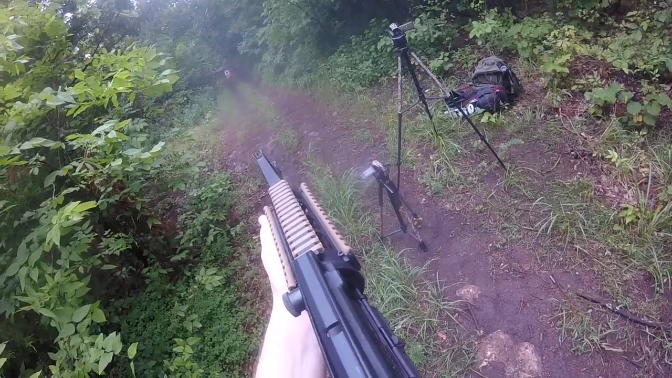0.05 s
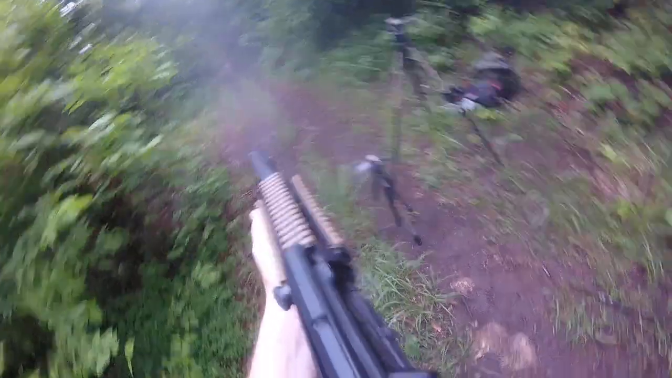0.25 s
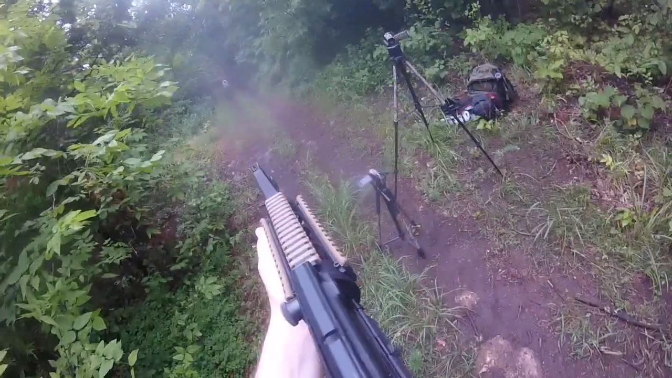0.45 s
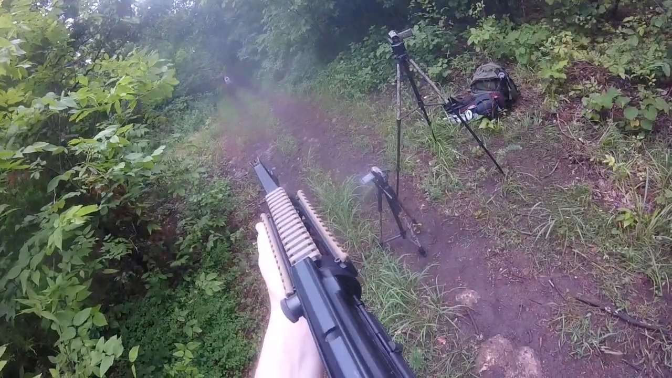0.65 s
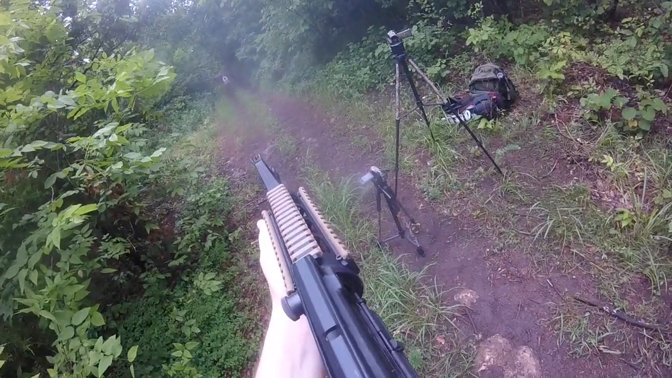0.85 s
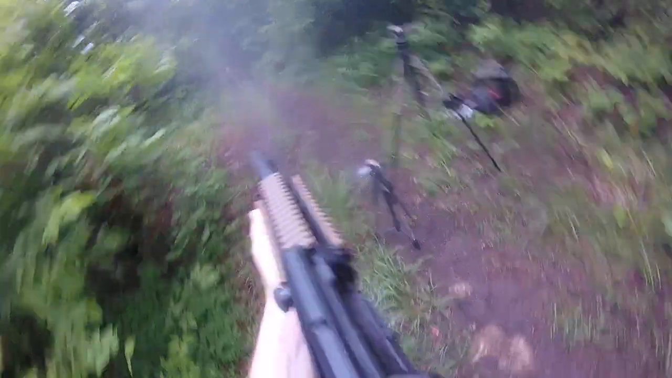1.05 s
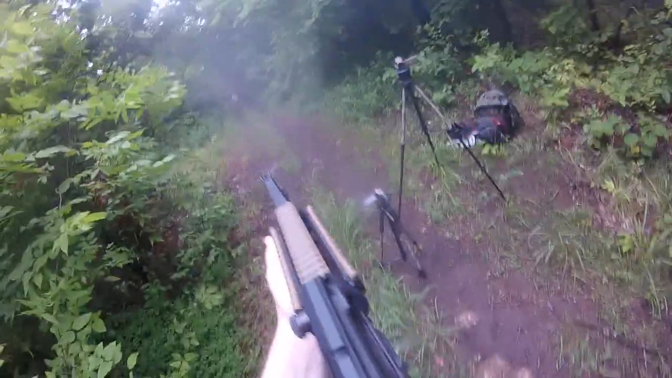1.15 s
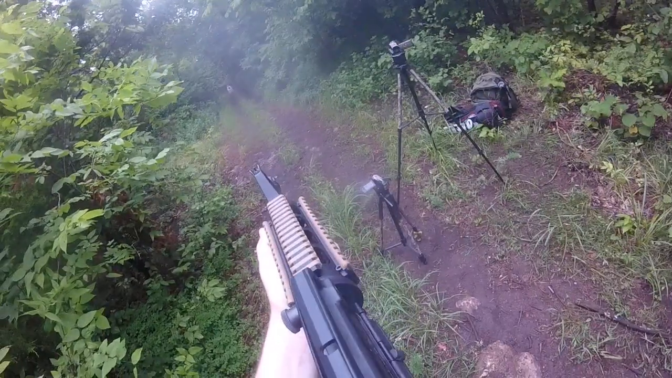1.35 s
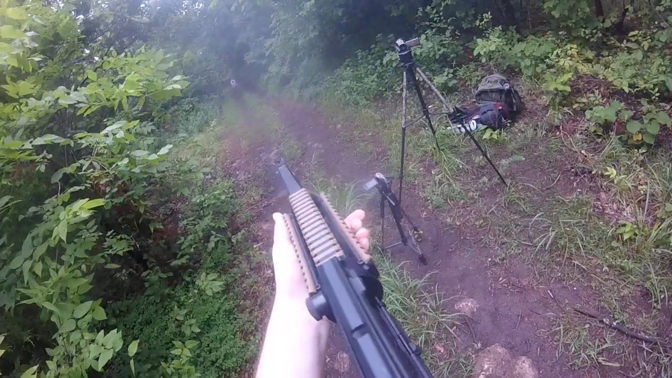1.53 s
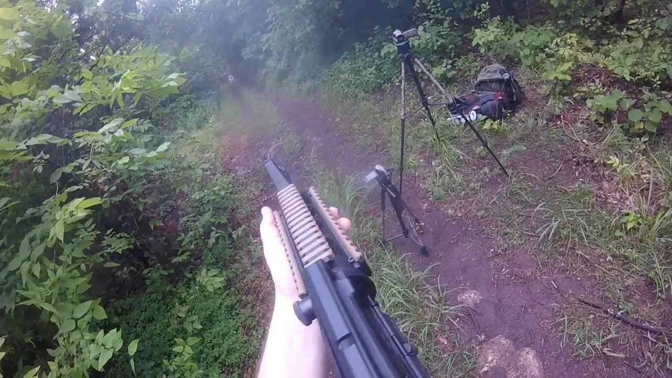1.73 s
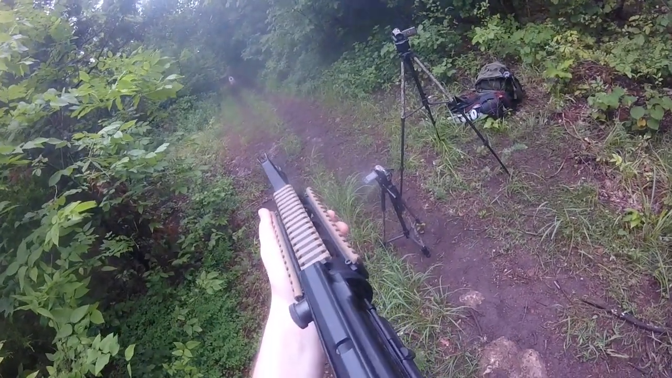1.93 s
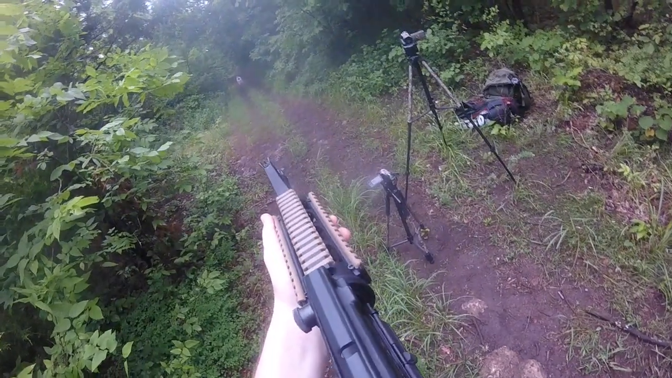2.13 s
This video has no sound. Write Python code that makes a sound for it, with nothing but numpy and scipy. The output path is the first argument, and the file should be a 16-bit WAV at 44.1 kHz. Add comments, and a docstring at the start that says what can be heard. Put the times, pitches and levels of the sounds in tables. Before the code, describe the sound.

A rifle fires two loud, close shots in a forest clearing, at about 0.2 and 1.0 seconds, over the fading echo of an earlier shot. Each sharp crack briefly overloads the microphone and slaps back off the trees, followed by a roar that swells for a third of a second and dies away. Near 2 seconds, a very faint rustle of gear sits under the last echo.

```python
"""A forest clearing, single rifle shots at close range, the microphone on the shooter's head.
The hammer clacks, the muzzle blast overloads the microphone and the trunks slap it back. The woods'
roar is held down just after the blast, comes up over a third of a second, then dies away. Two shots
fall over the tail of an earlier one; at the end the shooter's gear rustles faintly, close by."""
import sys
import numpy as np
from scipy import signal
from scipy.fft import rfft, irfft
from scipy.io import wavfile
from scipy.ndimage import uniform_filter1d

SR = 44100
rng = np.random.default_rng(int(sys.argv[2]) if len(sys.argv) > 2 else 0)


def transcribe(u):
    """Save the signal u as a 16-bit wav file named by the first command-line argument.

    u: samples, shape (n,) or (channels, n), limited to [-1, 1]; the rate is SR.
    q: integer samples, one column per channel.
    """
    v = np.clip(np.atleast_2d(u).T, -1, 1)
    q = np.round(v * 32767).astype(np.int16)
    wavfile.write(sys.argv[1], SR, q)


N = 94815


def amp(db):
    """Decibels to gain."""
    return 10 ** (np.asarray(db) / 20)


def unit_rms(x):
    """Scales to rms 1."""
    return x / np.sqrt(np.mean(x ** 2) + 1e-20)


def curve_at(points, hz):
    """Reads (frequency, value) points on a log-frequency axis."""
    f, value = np.transpose(points)
    return np.interp(np.log(hz + 1), np.log(f + 1), value)


def add(mix, s, sound):
    """Mixes a sound in at time s, which may lie before the start."""
    at = round(s * SR)
    sound = sound[max(-at, 0):]
    part = mix[max(at, 0):][:len(sound)]
    part += sound[:len(part)]


def noise(colour):
    """Noise of rms 1 with the given spectrum."""
    gain = amp(curve_at(colour, np.fft.rfftfreq(N, 1 / SR)))
    return unit_rms(irfft(rfft(rng.standard_normal(N)) * gain, N))


def pulse(colour, size=2048):
    """The sharpest causal pulse with the given spectrum, peak 1."""
    log_gain = np.log(amp(curve_at(colour, abs(np.fft.fftfreq(size, 1 / SR)))))
    minimum_phase = np.exp(np.conj(signal.hilbert(log_gain)))
    shape = np.fft.ifft(minimum_phase).real
    return shape / abs(shape).max()


def shock(t, decay_s):
    """A pressure pulse of peak 1: a quick push, then a longer suction."""
    u = np.maximum(t, 0) / decay_s
    wave = u * (2 - u) * np.exp(-u)
    return wave / wave.max()


# spectrum of the forest air (frequency [Hz], level [dB])
HISS_COLOUR = [(20, 0), (90, -3.5), (200, -8), (1000, -11), (3000, -30), (5000, -30), (7000, -28),
               (10000, -35), (12500, -42.5), (15000, -63)]
def forest_hiss():
    """The faint, steady bed of air all round the clearing."""
    return amp(-65) * noise(HISS_COLOUR)


# faint chirps (time [s], length [s], start pitch [Hz], end pitch [Hz], level [dB])
FALLING_CHIRPS = [(1.932, 0.028, 3800, 3150, -66), (1.96, 0.0353, 4100, 3450, -71),
                  (1.955, 0.037, 3500, 2200, -69)]
def chirps(t):
    """Short falling whistles, low in the background."""
    out = np.zeros(N)
    for s, length, start_hz, end_hz, db in FALLING_CHIRPS:
        u = t[t < length] / length
        turns = np.cumsum(start_hz + (end_hz - start_hz) * u) / SR
        add(out, s, amp(db) * np.sin(np.pi * u) * np.sin(2 * np.pi * turns))
    return out


# spectrum of wind on the microphone (frequency [Hz], level [dB])
RUMBLE_COLOUR = [(5, 8.5), (20, -3), (40, -7.5), (70, -15), (120, -13), (250, -35), (1000, -75),
                 (16000, -100)]
# the rumble as heard, dipping after each shot (time [s], level [dB])
RUMBLE_LEVELS = [(0, -53), (.2, -46), (.32, -64), (.8, -52), (1.0, -56.5), (1.12, -66), (1.7, -51),
                 (1.9, -45.5), (2.08, -42), (2.15, -45.5)]
def wind_rumble(t):
    """Low wind rumble on the microphone, ducking after each shot and slowly coming back."""
    return amp(np.interp(t, *np.transpose(RUMBLE_LEVELS))) * noise(RUMBLE_COLOUR)


# small movements of the gear (time [s], length [s], level [dB])
GEAR_MOVES = [(1.848, 0.013, -67), (2.052, 0.12, -72)]
# spectrum of rubbing cloth (frequency [Hz], level [dB])
CLOTH_COLOUR = [(100, -10), (2000, 0), (4000, 0.5), (5500, 0), (7000, -2.5), (10000, -6), (12500, -11),
                (15000, -35)]
def gear_rustle(t):
    """Clothes and sling rub softly, just below the microphone."""
    out = np.zeros(N)
    for s, length, db in GEAR_MOVES:
        u = t[t < length] / length
        add(out, s, amp(db) * np.sin(np.pi * np.sqrt(u)) * noise(CLOTH_COLOUR)[:len(u)])
    return out


def trunk_scatter(t):
    """Echoes from the many trunks: clumped at first, merging into an even roll."""
    depth_db = 2.5 * np.exp(-(t / .62) ** 2)
    clumps = amp(depth_db * unit_rms(uniform_filter1d(rng.standard_normal(N), size=130)))
    local_rms = np.sqrt(uniform_filter1d(clumps ** 2, size=2500))
    return clumps / local_rms * rng.standard_normal(N)


# scattered echo of the woods (band [Hz], relative level at the crest [dB], held down at first by [dB],
# crest time [s], first t60 [s], late roll re the crest [dB], late t60 [s])
WOODS_BANDS = [(30, -36, 12, 0.26, 1.4, -12.5, 4), (70, -19, 24, 0.48, 1.2, -5, 12),
               (140, -11, 1, 0.36, 1.2, -18, 11), (231.5, -17, 0.5, 0.26, 0.99, -12.5, 5.4),
               (379, -6.5, 7.5, 0.26, 1.5, -8, 5.1), (628, 0.5, 4.5, 0.36, 2.08, -11, 4.7),
               (1025, -5.5, 7.5, 0.35, 1.1, -10, 4.8), (1355, -8, 9, 0.26, 1.9, -9, 4.4),
               (1694, -22, 4, 0.33, 1.26, -8.5, 3.5), (2550, -22, 4, 0.31, 1.09, -14, 3.1),
               (3390, -21, 1, 0.32, 0.95, -20.5, 2.6), (3890, -28, 1, 0.33, 0.84, -18.5, 2.8),
               (7000, -31.5, 0, 0.29, 0.77, -33, 1.9), (10450, -37, -1.5, 0.3, 0.7, -38.5, 2),
               (15500, -53.5, -9, 0.21, 0.42, -52, 1.5)]
WOODS_DB, WOODS_ONSET_S, TRUNK_TOP_HZ = -24, .025, 1610
def woods_roar(t, trunks, treble_stretch):
    """Trunks return the lows, leaves the highs; the roar is held down, comes up, then dies away."""
    hz = np.fft.rfftfreq(N, 1 / SR)
    colour = unit_rms(amp(curve_at([row[:2] for row in WOODS_BANDS], hz)))
    leaves = rng.standard_normal(N)
    scatter = colour * np.where(hz < TRUNK_TOP_HZ, rfft(trunks), rfft(leaves))
    out = np.zeros(N)
    for k, (band_hz, _, dip_db, crest_s, t60, late_db, late_t60) in enumerate(WOODS_BANDS):
        band = curve_at([(row[0], j == k) for j, row in enumerate(WOODS_BANDS)], hz)
        dip_left = np.clip(2 * (1 - t / crest_s), 0, 1)
        dip = amp(-dip_db * np.sin(np.pi / 2 * dip_left) ** 2)
        stretch = treble_stretch if band_hz > TRUNK_TOP_HZ else 1
        past_crest = np.maximum(t / stretch - crest_s, 0)
        fade = np.hypot(amp(-60 * past_crest / t60), amp(late_db - 60 * past_crest / late_t60))
        out += irfft(scatter * band, N) * dip * fade
    return amp(WOODS_DB) * np.minimum(t / WOODS_ONSET_S, 1) * out


# single echoes, from the nearest trunks out to the tree line (delay [s], level [dB])
SLAPS = [(.0087, -6.5), (.0172, -15.5), (.0234, -13), (0.032, -13), (0.047, -9.5), (.0497, -19),
         (.0527, -20), (0.0962, -23), (0.1155, -21), (.1372, -24), (.1587, -19.5), (.1806, -15.5),
         (.236, -21.5), (.2455, -16), (0.2686, -16.5), (0.3194, -15), (.3355, -14.5), (0.3507, -14.5),
         (.435, -17.5), (0.4619, -25), (0.4713, -22), (0.5141, -19), (0.754, -28), (0.9606, -28)]
# spectrum of one echo before air loss (frequency [Hz], level [dB])
SLAP_COLOUR = [(30, -12.5), (130, -14), (300, -9.5), (450, -2.5), (680, 1.5), (1000, -4), (1350, -6.5),
               (1800, -27), (3300, -30), (6000, -57), (16000, -90)]
AIR_LOSS_DB_PER_KHZ_S = 6
def trunk_slaps():
    """Each large reflector returns one sharp pulse, duller the farther it stands from the microphone."""
    out = np.zeros(N)
    for delay, db in SLAPS:
        colour = [(hz, level - AIR_LOSS_DB_PER_KHZ_S * delay * hz / 1000) for hz, level in SLAP_COLOUR]
        add(out, delay, amp(db) * pulse(colour))
    return out


# spectrum of the hammer fall (frequency [Hz], level [dB])
HAMMER_COLOUR = [(30, -22.5), (700, -1), (1800, -1), (3200, 4), (4500, -7), (7000, -3.5), (15000, -27.5)]
HAMMER_LEAD_S, HAMMER_T60 = .0078, .016
def hammer(t):
    """A short steel clack close to the microphone, just ahead of the blast."""
    return amp(-60 * t / HAMMER_T60) * noise(HAMMER_COLOUR)


# spectrum of the crack at the muzzle (frequency [Hz], level [dB])
CRACK_COLOUR = [(30, -23), (150, -8.5), (300, -8.5), (700, -1), (1100, -4), (1370, 5.5), (1750, -9.5),
                (2500, -6.5), (3300, -5.5), (4200, -9.5), (5200, -11), (7000, -15), (11000, -15.5),
                (15000, -23)]
# spectrum of the spray from nearby brush and the cycling action (frequency [Hz], level [dB])
SPRAY_COLOUR = [(30, -11.5), (150, -8.5), (280, -16), (680, 0), (1000, 6.5), (1350, -9.5), (1800, -7.5),
                (2500, -10), (3300, -5.5), (4200, -11), (7000, -15.5), (11000, -18), (15000, -24)]
CRACK_RISE_S, CRACK_HOLD_S, CRACK_FALL_S, SPRAY_T60 = .0007, .0045, .0023, .22
def muzzle_blast(t):
    """A barrel's length away: a pressure pulse, milliseconds of tearing gas, then spray from the brush."""
    pressure = -amp(-3) * shock(t - CRACK_RISE_S / 2, decay_s=.0005)
    crack = np.minimum(t / CRACK_RISE_S, 1) * np.exp(-np.maximum(t - CRACK_HOLD_S, 0) / CRACK_FALL_S)
    spray = np.minimum(t / CRACK_HOLD_S, 1) * amp(-19.5 - 60 * t / SPRAY_T60)
    return pressure + amp(-9) * crack * noise(CRACK_COLOUR) + spray * noise(SPRAY_COLOUR)


def gas_thump(t):
    """The slow puff of muzzle gas reaching the microphone."""
    return -shock(t, decay_s=.005)


# rifle shots (time [s], level of blast and echoes [dB], gas thump [dB], ground bounce [dB], hammer [dB],
# stretch of the woods' treble decay [ratio])
RIFLE_SHOTS = [(-0.708, 0.5, -25, -12, -26, .94), (0.2283, 0.32, -17, -9.5, -17, .94),
               (1.0302, -.5, -37, -6, -26, 1.008)]
GROUND_BOUNCE_DELAY_S = .00483
def scene():
    """The shooter keeps to one spot in the clearing, so the trunks give every shot the same answer."""
    t = np.arange(N) / SR
    slaps, trunks = trunk_slaps(), trunk_scatter(t)
    out = forest_hiss() + chirps(t) + wind_rumble(t) + gear_rustle(t)
    for s, db, thump_db, bounce_db, hammer_db, treble_stretch in RIFLE_SHOTS:
        add(out, s - HAMMER_LEAD_S, amp(hammer_db) * hammer(t))
        add(out, s, amp(db) * (muzzle_blast(t) + slaps + woods_roar(t, trunks, treble_stretch)))
        add(out, s, amp(thump_db) * gas_thump(t))
        add(out, s + GROUND_BOUNCE_DELAY_S, amp(bounce_db) * shock(t, decay_s=.00037))
    return out[None]


OVERLOAD_CEILING, BAND_LIMIT_HZ = .8, 15800
def record(dry):
    """This near the muzzle the microphone flattens the peaks; a low-pass then cuts the top treble."""
    clipped = dry / (1 + (dry / OVERLOAD_CEILING) ** 4) ** (1 / 4)
    low_pass = signal.firwin(255, BAND_LIMIT_HZ, window=("kaiser", 9), fs=SR)
    return signal.oaconvolve(clipped, low_pass[None], "same")


dry = scene()
out = record(dry)
transcribe(out)
```